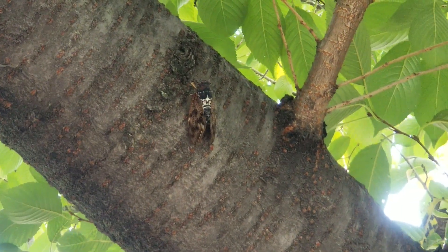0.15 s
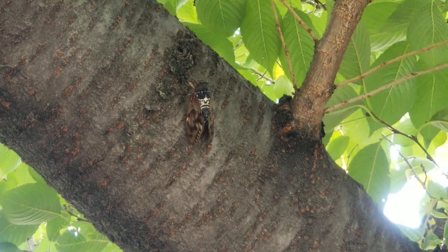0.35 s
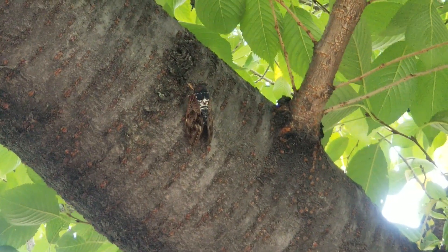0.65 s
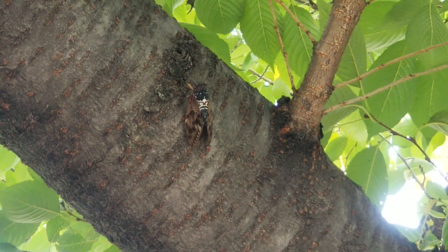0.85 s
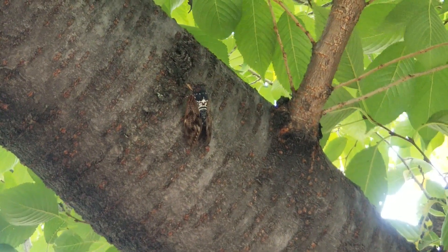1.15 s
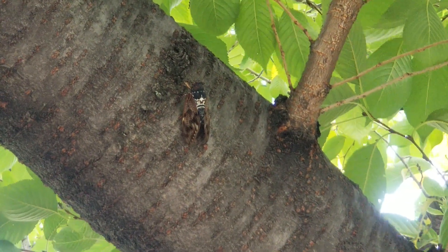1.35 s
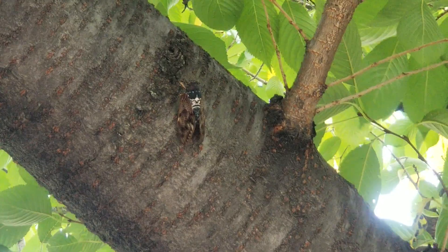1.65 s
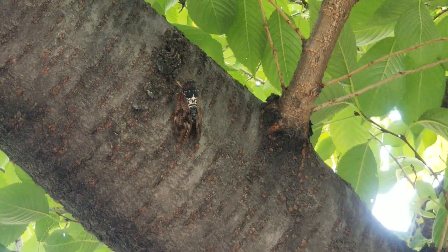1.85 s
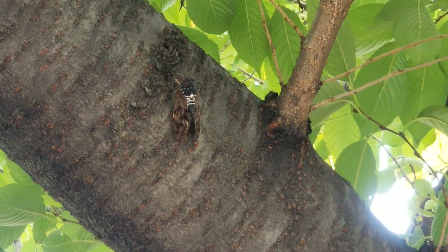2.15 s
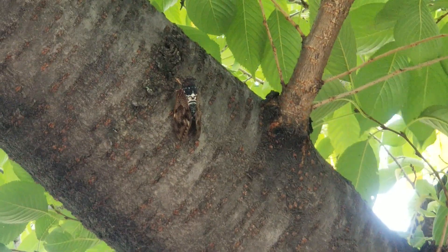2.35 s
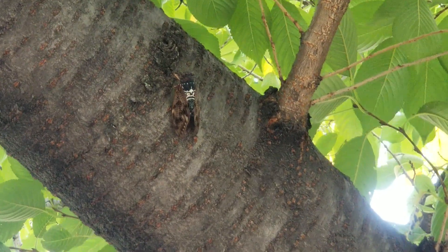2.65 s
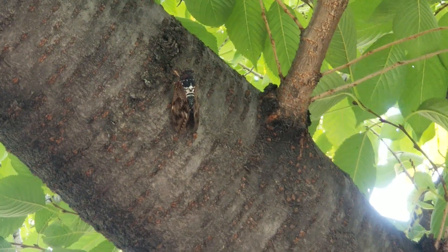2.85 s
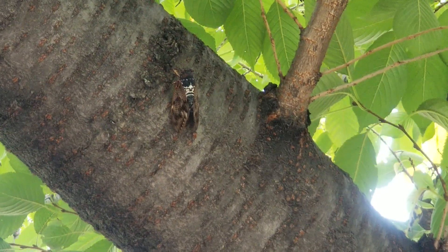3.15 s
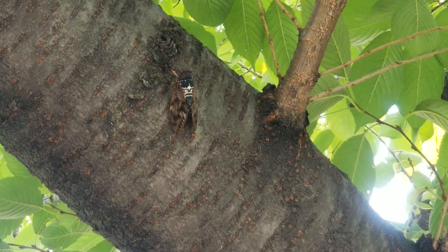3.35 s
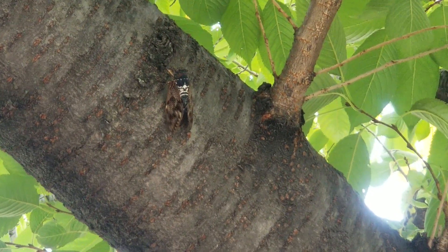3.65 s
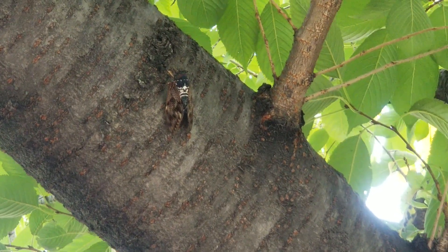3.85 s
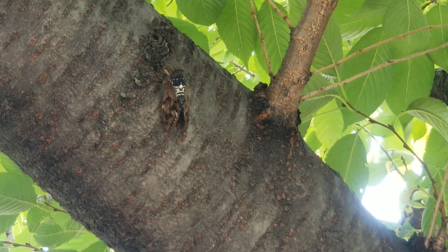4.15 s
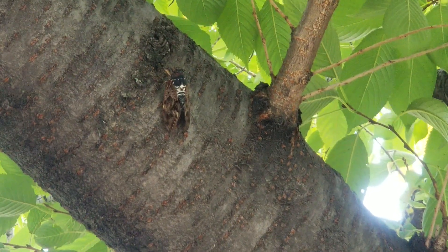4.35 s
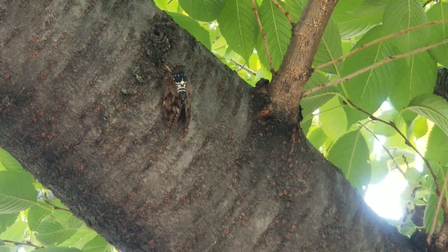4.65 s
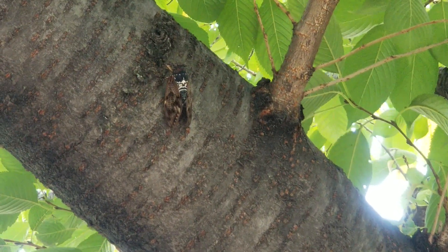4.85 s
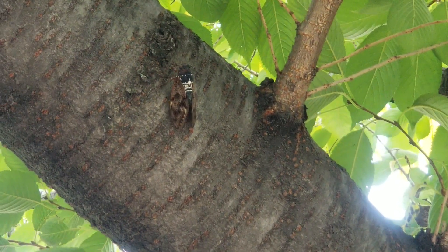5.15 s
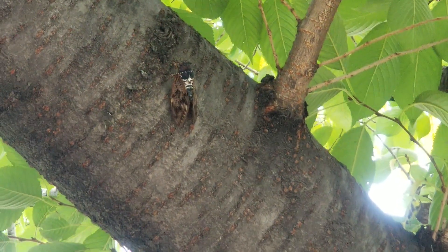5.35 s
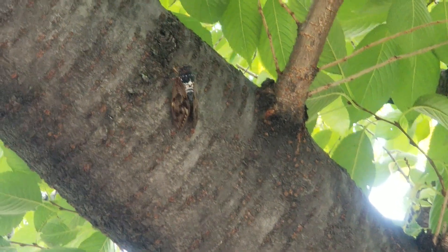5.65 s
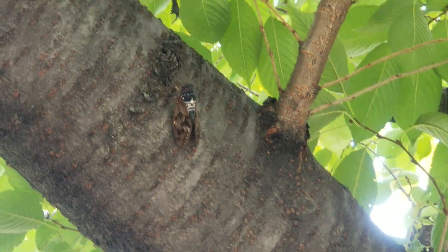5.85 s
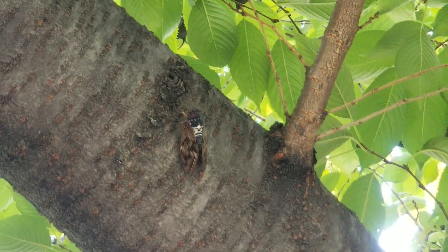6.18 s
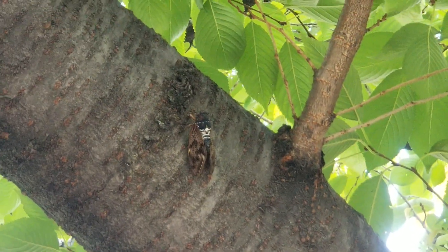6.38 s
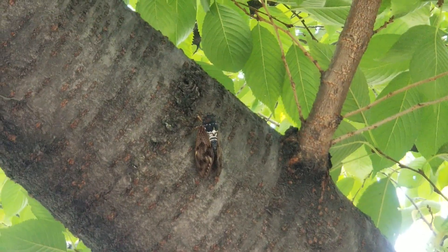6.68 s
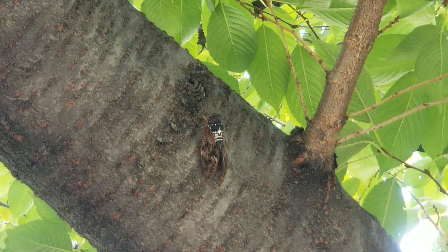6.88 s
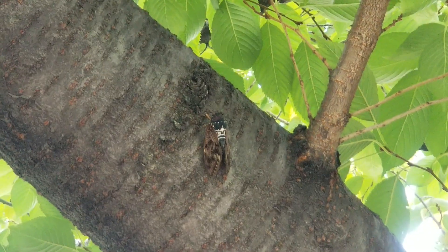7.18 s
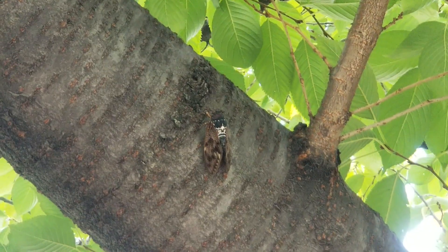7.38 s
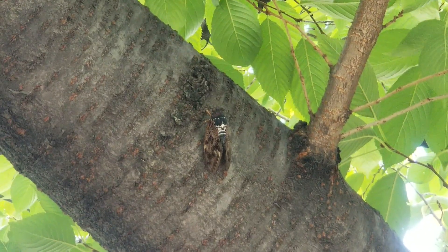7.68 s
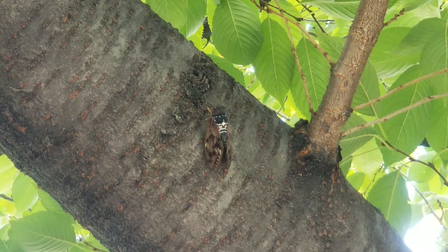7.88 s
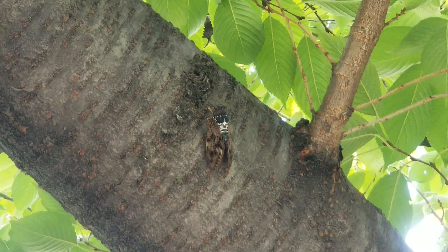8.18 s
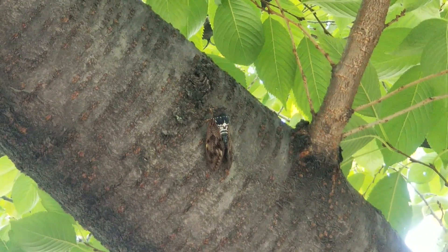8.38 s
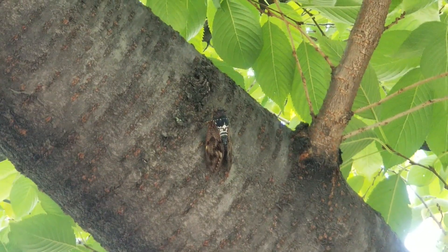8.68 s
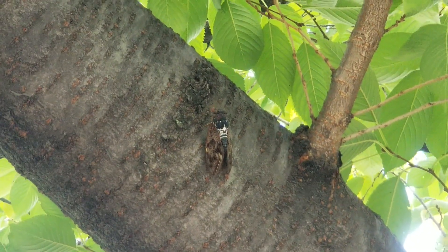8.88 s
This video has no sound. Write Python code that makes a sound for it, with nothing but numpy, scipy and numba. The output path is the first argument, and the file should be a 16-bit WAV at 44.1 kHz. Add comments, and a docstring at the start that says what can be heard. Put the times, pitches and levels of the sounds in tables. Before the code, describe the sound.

Continuous high insect buzzing from start to finish, crisp and grainy, with a rapid throb and evenly repeated rising, squeaky surges. Between surges come irregular dry clicks and short raspy pulses. Leaves and bark scatter the sound slightly, with more cicadas blended behind. The near camera microphone picks up dull finger bumps during the opening seconds, strongest around 2.4 to 2.7, over quiet low rumble; afterwards only the song and faint outdoor air remain.

```python
"""Cicada on a tree trunk

A cicada sizzles close above a hand-held camera: click trains from two tymbals excite resonances, and the abdomen throbs.
About every 0.7 s a resonance surges upward in pitch; loose ticks fill the gaps, over a low stuttering rasp.
Short decaying noise echoes scatter the insect's sound as bark and leaves do. Fingers bump the camera body,
a damped flexing with a dull rub, over coloured noise for the outdoor rumble and wash, and faint low drones."""
import sys
import numpy as np
from scipy import signal
from scipy.fft import rfft, irfft
from scipy.io import wavfile
from scipy.ndimage import uniform_filter1d
from numba import njit

SR = 44100
rng = np.random.default_rng(int(sys.argv[2]) if len(sys.argv) > 2 else 0)


def digitize_waveform(pressure):
    """Quantize a signal to 16-bit integers and store it at the path in sys.argv[1].

    Rows of a 2-D input are taken as channels; values are limited to [-1, 1].
    """
    field = np.atleast_2d(pressure).T
    bounded = np.clip(field, -1, 1)
    quanta = np.round(bounded * 32767).astype(np.int16)
    wavfile.write(sys.argv[1], SR, quanta)


N = 397782
TIME = np.arange(N) / SR


def undb(db):
    """Logarithmic level: decibels to amplitude gain."""
    return 10 ** (np.asarray(db) / 20)


def unit(x):
    """Normalisation: scale to rms 1."""
    return x / np.sqrt(np.mean(x ** 2))


def curves(table):
    """Linear interpolation: each column of a table, joined by lines over time."""
    s, *columns = np.transpose(table)
    return [np.interp(TIME, s, column) for column in columns]


def walk(rate_hz):
    """Band-limited fluctuation: smoothed random steps, rate_hz a second, with rms 1."""
    hold = max(int(SR / rate_hz), 1)
    steps = np.repeat(rng.standard_normal(N // hold + 1), hold)
    return unit(uniform_filter1d(steps, hold)[:N])


def hump(s, length):
    """Amplitude envelope: a rounded rise and fall from 0 to 1, centred on s, down to 1/e at length / 2."""
    return np.exp(-(2 * (TIME - s) / length) ** 4)


def pan(x, db):
    """Interaural level difference: the left channel stands db above the right."""
    return x * undb(np.array([[.5], [-.5]]) * db)


@njit
def svf(x, hz, width):
    """Simple resonator: a state-variable band-pass whose centre may move, with gain 1 there."""
    y, band, low = np.empty(len(x)), 0., 0.
    for i in range(len(x)):
        w = 2 * np.pi * hz[i] / SR
        g = np.tan(w / 2)
        damping = width / hz[i] * w / np.sin(w)
        v = (band + g * (x[i] - low)) / (1 + g * (g + damping))
        band = 2 * v - band
        low = low + 2 * g * v
        y[i] = damping * v
    return y


def ring(x, hz, width):
    """Cascaded resonance: two equal resonators in series steepen the skirts."""
    hz = np.clip(hz + np.zeros(len(x)), 20, .45 * SR)
    return svf(svf(x, hz, float(width)), hz, float(width))


def colour(x, points):
    """Spectral shaping: filter by (Hz, dB) points, falling away beyond the outermost; rms 1."""
    hz, db = np.transpose(sorted(points))
    log_hz = np.log(np.fft.rfftfreq(N, 1 / SR) + 1)
    outside = np.abs(log_hz - np.clip(log_hz, np.log(hz[0]), np.log(hz[-1])))
    gain = undb(np.interp(log_hz, np.log(hz), db) - 45 * outside)  # about 31 dB an octave outside
    return unit(irfft(rfft(x) * gain, N))


def noise(points, side_db):
    """Diffuse field: coloured noise as a mid part and a side part of opposite sign left and right."""
    mid, side = colour(rng.standard_normal((2, N)), points)
    return mid + undb(side_db) * side * np.array([[1], [-1]])


def tymbal(rate_hz, jitter, scatter_db, crackle, crackle_s):
    """Impulsive excitation by buckling: uneven clicks, each followed by the crackle of smaller ribs."""
    rate = rate_hz * (1 + jitter * walk(rate_hz) + .008 * walk(3))
    turns = np.cumsum(rate) / SR + rng.random()
    cycle = turns.astype(int)
    size = undb(scatter_db * rng.standard_normal(N)[cycle])  # one random size a click
    click = np.diff(cycle, prepend=cycle[0]) * 1.
    since_click_s = (turns % 1) / rate_hz
    tail = np.exp(-since_click_s / crackle_s) * rng.standard_normal(N)
    return unit(size * (unit(click) + crackle * unit(tail)))


def foliage(x, wet_db, t60, count=3):
    """Multiple scattering: direct sound plus short echoes off bark and leaves, shifting as leaves and hand sway."""
    t = np.arange(SR // 6) / SR
    wet = 0
    for k in range(count):
        echoes = rng.standard_normal((2, len(t))) * np.exp(-np.log(1000) * t / t60)
        echoes /= np.sqrt(np.sum(echoes ** 2, axis=1, keepdims=True))
        # the squared weights of the echo patterns always sum to 1
        sway = np.cos(2 * TIME + np.pi * k / count) * np.sqrt(2 / count)
        wet = wet + sway * signal.fftconvolve(x[None], echoes, axes=1)[:, :N]
    return (x + undb(wet_db) * wet) / np.sqrt(1 + undb(2 * wet_db))


# Resonant spectrum of the abdomen's air sac. Each row: frequency in Hz, relative level in dB.
AIR_SAC_SPECTRUM = [(3500, -32), (4050, -17), (4600, -11), (5000, 0), (5300, 1), (5800, -2), (6150, -5.5),
                    (6900, -16), (8000, -25), (9200, -23), (11100, -14.5), (13000, -10)]
# Resonant spectrum of the tymbal ribs. Each row: frequency in Hz, relative level in dB.
RIB_SPECTRUM = [(6000, -2), (7500, -3.5), (8300, -4.5), (9200, -20), (10000, -17), (11100, -5),
                (12100, -9.5), (13000, -2), (13950, 1.5), (14800, -6), (15700, -2)]


def sweep(clicks, turns, low_hz=5700, high_hz=7650, width_hz=1150, start=.4, top=.65, low_db=-8, octave_db=-4.5):
    """Moving resonance: once a throb, a band and its octave swell, glide up, sink back partly and fade."""
    share = (turns - start) % 1  # start and top are shares of a throb
    hz = low_hz + (high_hz - low_hz) * np.sin(np.pi / 2 * share / top)
    swell = np.sin(np.pi * share)
    low = colour(ring(clicks, hz, width_hz) * swell, AIR_SAC_SPECTRUM)
    octave = colour(ring(clicks, 2 * hz, 2 * width_hz) * swell ** 2, RIB_SPECTRUM)
    return undb(low_db) * low, undb(octave_db) * octave


# Pumping of the abdomen. Each row: time in seconds, throbs a second.
THROB_RATE = [(0, 14.285), (2, 14.85), (3, 14.73), (4.3, 14.92), (9, 14.96)]
# Strength of the steady sizzle. Each row: time in seconds, relative level of the air sac in dB,
# relative level of the rib treble in dB.
SIZZLE_LEVELS = [(0.0, -29, -31), (0.38, -30.5, -31.5), (2.86, -29, -31), (3.49, -32.5, -35),
                 (3.74, -31.5, -35.5), (4.22, -28.5, -30.5), (4.55, -29.5, -32.5), (4.97, -27.5, -32),
                 (5.27, -29.5, -32), (6.56, -28, -33.5), (7.18, -28, -33.5), (9.02, -23.5, -38)]
# Narrow ringing strands of the air sac. Each row: frequency in Hz, width of each resonator in Hz,
# relative level in dB, time when strongest in seconds, length in seconds.
AIR_SAC_STRANDS = [(5312, 55, -12.5, 4.2, 6.8), (5680, 80, -13, 2.9, 1.7), (5865, 50, -12.5, 5.8, .9)]


def sizzle(chorus_db=-5.5, chorus_treble_db=-8, chorus_side_db=-2, sac_db=-1.66, treble_db=-1, resting_db=-11,
           strand_waver_db=1.5, throb_treble_db=2.2, throb_body_db=-.7):
    """Source and resonator: two tymbals ring ribs and air sac; each throb trades top treble against body."""
    body_db, ribs_db = curves(SIZZLE_LEVELS)
    turns = np.cumsum(curves(THROB_RATE)[0]) / SR
    throb = np.cos(2 * np.pi * turns)
    clicks = tymbal(186, jitter=.04, scatter_db=1.5, crackle=6.3, crackle_s=0.028)
    clicks = clicks + tymbal(368, jitter=.06, scatter_db=-1.0, crackle=1.1, crackle_s=0.003)
    sweep_clicks = tymbal(368, jitter=0.048, scatter_db=.5, crackle=7.1, crackle_s=0.0063)
    glide, octave = sweep(sweep_clicks, turns)
    # the strands come and go as the air sac changes shape
    strands = 0
    for hz, width, db, s, length in AIR_SAC_STRANDS:
        presence_db = resting_db * (0.5 - hump(s, length))
        strand_db = db + presence_db + strand_waver_db * walk(2.97)
        strands = strands + unit(ring(clicks, hz, width)) * undb(strand_db)
    body = foliage(colour(clicks, AIR_SAC_SPECTRUM) + strands + glide, wet_db=-1, t60=0.13)
    ribs = foliage(colour(clicks, RIB_SPECTRUM) + octave, wet_db=-4.5, t60=0.055)
    # cicadas further off add a smooth wash of the same colour from all around
    body = body + undb(chorus_db) * noise(AIR_SAC_SPECTRUM, chorus_side_db)
    ribs = ribs + undb(chorus_treble_db) * noise(RIB_SPECTRUM, chorus_side_db)
    # the top of the treble opens and closes with the abdomen
    top = signal.sosfiltfilt(signal.butter(4, 12800, "high", fs=SR, output="sos"), ribs)
    ribs = ribs - top + top * undb(throb_treble_db * throb)
    body = body * undb(throb_body_db * throb)
    body = body * undb(body_db + sac_db + .5 * walk(20))
    return pan(body, 0.16) + pan(ribs * undb(ribs_db + treble_db), 4.4)


# Rumble of the grip and the surroundings. Each row: time in seconds, relative level in dB.
RUMBLE_LEVEL = [(0.0, -43), (0.4, -44.5), (2.31, -41.5), (2.59, -35), (2.76, -31), (2.91, -44),
                (3.37, -50.5), (3.62, -43.5), (3.87, -43), (5.98, -43), (6.16, -45.5), (9.02, -44.5)]
# Spectrum of the rumble. Each row: frequency in Hz, relative level in dB.
RUMBLE_SPECTRUM = [(15, -45), (25, -13), (51, -4), (75, 2.5), (135, 0.5), (167, -4.5), (196, 1),
                   (221, -7.5), (285, -11), (600, -33.5), (780, -31), (1320, -120)]
# Distant outdoor wash. Each row: time in seconds, relative level in dB.
WASH_LEVEL = [(0.2, -59), (1.61, -60), (2.81, -57), (3.6, -61), (4.27, -56), (8.58, -58), (8.8, -59)]
# Spectrum of the wash. Each row: frequency in Hz, relative level in dB.
WASH_SPECTRUM = [(250, 10.5), (450, 0.5), (750, 0), (1300, -5.5), (2200, -4), (3200, -4), (8000, -10),
                 (16000, -15.5)]
# Faint drones that come and go. Each row: middle in seconds, level in dB, pitch in Hz, length in seconds.
LOW_DRONES = [(0.745, -47, 203, 0.91), (4.57, -44, 138.4, 0.84)]
# The hand comes to rest: start and end of the settling, in seconds.
GRIP_SETTLING = (3.2, 3.3)


def outdoors(rumble_db=0.46, wash_db=10, wash_side_db=-8.2, shifting_db=2.2, resting_db=0.05,
             grip_db=-45, grip_hz=62, grip_width_hz=90):
    """Broadband ambience: low rumble, partly carried through the grip, faint drones and a distant wash."""
    # while the grip shifts, the rumble is deeper and more uneven and leans further left
    shifting = np.interp(TIME, GRIP_SETTLING, [1, 0])
    uneven_db = resting_db + shifting * (shifting_db - resting_db)
    rumble_level_db = curves(RUMBLE_LEVEL)[0] + rumble_db + uneven_db * walk(12)
    rumble = noise(RUMBLE_SPECTRUM, side_db=-30) * undb(rumble_level_db)
    grip = unit(ring(rng.standard_normal(N), grip_hz, grip_width_hz))
    grip = shifting * grip * undb(grip_db + shifting_db * walk(7.43))
    wash_level_db = curves(WASH_LEVEL)[0] + wash_db + 1.22 * walk(5)
    wash = noise(WASH_SPECTRUM, wash_side_db) * undb(wash_level_db)
    drones = 0
    for s, db, hz, length in LOW_DRONES:
        drone = unit(ring(rng.standard_normal(N), hz, 5.8))
        drones = drones + undb(db) * hump(s, length) * drone
    return pan(rumble + grip, 0.96 + 3.2 * shifting) + pan(wash + drones, 0.51)


# Rising surges of the song. Each row: time of the top in seconds, level in dB,
# relative level of the overtone in dB.
RISING_SURGES = [(.113, -21.5, -7.5), (.8, -22.5, -6.5), (1.446, -23, -6.5), (2.101, -23.5, -6.5),
                 (2.803, -23.5, -7.5), (3.479, -25, -11.5), (4.184, -22.5, -9), (4.884, -22, -8.5),
                 (5.548, -24, -7), (6.204, -22, -10), (6.849, -21.5, -12), (7.555, -22, -10.5),
                 (8.238, -21.5, -10), (8.91, -22, -10.5)]


def surges(low_hz=4550, high_hz=6250, over_low_hz=9900, over_high_hz=12200, lead_s=0.084, climb_s=0.024,
           fall_s=0.011, edge_hz=4150):
    """Tension raises resonance: the tymbal tightens, a note swells, climbs late with its overtone, and stops."""
    swell, overtone, tension = np.zeros((3, N))
    for s, db, over_db in RISING_SURGES:
        near = np.abs(TIME - s) < .3
        t = TIME[near] - s
        tension[near] = np.exp(-(np.minimum(t, 0) / climb_s) ** 2)
        rise = 1 / (1 + np.exp(-(t + lead_s) / 0.023))  # half-way up lead_s before the top
        stop = 1 / (1 + np.exp((t - .017) / fall_s))
        swell[near] += undb(db) * rise * stop
        overtone[near] = undb(over_db) * (0.56 + 1.68 * tension[near])
    clicks = tymbal(345, jitter=0.083, scatter_db=1.5, crackle=1.36, crackle_s=0.0023)
    low = ring(clicks, low_hz + 200 * tension, 1230)
    low = unit(signal.sosfilt(signal.butter(5, edge_hz, "high", fs=SR, output="sos"), low))
    high = unit(ring(clicks, high_hz - 1000 * (1 - tension), 890))
    over = unit(ring(clicks, over_low_hz + (over_high_hz - over_low_hz) * tension, 3100))
    song = swell * (0.77 * low + high * (0.32 + 0.33 * tension) + overtone * over)
    # the surges lean left at first and come nearer the middle as the camera drifts
    return pan(foliage(song, wet_db=-2.5, t60=0.087), np.interp(TIME, [0, 9], [5.5, 1.5]))


# Spectrum of the low rasp. Each row: frequency in Hz, relative level in dB.
RASP_SPECTRUM = [(1900, -27), (2500, -17.5), (3300, -13.5), (3900, -14.5), (4500, 0), (5150, 5),
                 (6000, -23), (8000, -16), (9300, -13), (10700, -3.5), (12500, -14), (15500, -35)]
# Long rasps. Each row: middle in seconds, relative level in dB.
LONG_RASPS = [(2.93, -22.5), (5.172, -24), (5.5, -22), (8.44, -22)]
# Runs of short rasping pulses. Each row: first pulse in seconds, last pulse in seconds,
# pulses a second, relative level in dB.
STUTTER_RUNS = [(.089, 1.44, 16.2, -28.5), (1.557, 2.36, 16.22, -29), (2.415, 2.74, 18.4, -27.5),
                (3.07, 4.12, 15.2, -30.5), (4.408, 4.66, 16, -28.5), (5.0, 5.37, 13.5, -28.5),
                (5.642, 6.05, 17.2, -30), (6.398, 6.97, 17.5, -28.5), (7.138, 7.78, 15.7, -28.5),
                (7.992, 8.06, 15.4, -28), (8.52, 8.95, 16.4, -29.5)]


def rasps(rasp_db=-4, rasp_s=0.095, stutter_db=-2.5, pulse_s=.016):
    """Amplitude modulation: slack, coarse clicks gated into even stuttering runs and a few long rasps."""
    effort = sum(undb(db + rasp_db) * hump(s, rasp_s) for s, db in LONG_RASPS)
    for first, last, rate, db in STUTTER_RUNS:
        # number of the pulse nearest to each moment
        nearest = np.clip(np.round((TIME - first) * rate), 0, np.round((last - first) * rate))
        effort = effort + undb(db + stutter_db) * hump(first + nearest / rate, pulse_s)
    clicks = tymbal(320, jitter=.12, scatter_db=1.5, crackle=1.1, crackle_s=.002)
    return pan(foliage(colour(clicks, RASP_SPECTRUM) * effort, wet_db=-18, t60=.04), 0.92)


# Spectrum of a slack tymbal's click. Each row: frequency in Hz, relative level in dB.
SLACK_SPECTRUM = [(2500, -31), (3400, -25), (3950, -15), (4400, 0), (4900, -3.5), (5600, -9), (7000, -28),
                  (8800, -23), (11000, -14), (15500, -24)]
# The loudest loose clicks. Each row: time in seconds, relative level in dB.
LOUD_TICKS = [(.218, -41), (.911, -37.5), (.959, -37), (1.614, -38), (1.736, -35), (4.409, -37),
              (5.374, -40), (5.817, -39), (6.56, -39), (6.621, -40), (7.093, -40), (7.937, -38),
              (8.334, -34), (8.703, -39)]


def ticks(tick_db=-38.0, patter_hz=50, patter_db=-44, patter_scatter_db=1.5, uneven=.65, rest_s=.085):
    """Irregular impulses through a resonator: a slack tymbal ticks between surges; some clicks stand out."""
    turns = np.cumsum(patter_hz * np.exp(uneven * walk(patter_hz))) / SR
    # the patter rests for rest_s on either side of a surge's top
    ticking = np.all([np.abs(TIME - s) > rest_s for s, *_ in RISING_SURGES], axis=0)
    size = undb(patter_db + patter_scatter_db * walk(patter_hz))
    clicks = np.diff(np.floor(turns), prepend=0) * ticking * size
    for s, db in LOUD_TICKS:
        clicks[int(s * SR)] += undb(db)
    # colouring sets the whole train to rms 1, so the click levels are relative
    return pan(foliage(colour(clicks, SLACK_SPECTRUM) * undb(tick_db), wet_db=-5, t60=0.07), 0.27)


# Finger bumps on the camera. Each row: time in seconds (3 ms after the onset), relative level in dB,
# pitch of the flexing in Hz.
FINGER_BUMPS = [(0.263, -27.5, 100), (0.375, -23, 117), (0.409, -22.5, 117), (0.689, -28, 191),
                (.765, -23.5, 90), (.794, -32, 163), (1.051, -20, 109), (1.08, -25.5, 160),
                (1.14, -22.5, 101), (1.443, -26.5, 127), (1.742, -23, 122), (1.816, -27.5, 157),
                (1.866, -29, 92), (2.381, -17.5, 101), (2.411, -21, 110), (2.507, -24, 116),
                (2.572, -24, 154), (2.701, -23.5, 177), (2.742, -16.5, 137), (2.902, -23.5, 97),
                (3.145, -32, 158), (3.72, -27.5, 121), (3.775, -26, 97)]


def handling(bump_db=1, push_s=0.0065, shell_db=-7, dull_hz=430):
    """Damped oscillation: each bump flexes the camera body for about a cycle and leaves a short dull rub."""
    out = np.zeros(N + SR)
    t = np.arange(SR // 5) / SR
    for s, db, hz in FINGER_BUMPS:
        flex = np.sin(2 * np.pi * hz * t) * np.exp(-t / push_s) * (1 - np.exp(-t / 0.0022))
        rub = unit(ring(rng.standard_normal(len(t)), 1.13 * hz, 1.15 * hz))
        rub = rub * np.exp(-t / 0.026) * (1 - np.exp(-t / 0.00087))
        start = max(int((s - .003) * SR), 0)
        out[start:start + len(t)] += undb(db + bump_db) * (2.83 * flex + undb(shell_db) * rub)
    return pan(signal.sosfilt(signal.butter(4, dull_hz, fs=SR, output="sos"), out[:N]), 9.3)


def scene():
    """Superposition: everything heard under the tree is summed."""
    return sizzle() + outdoors() + surges() + rasps() + ticks() + handling()


def record(dry, top_hz=15800):
    """Band limiting: the camera cuts the top steeply, by an elliptic low-pass."""
    return signal.sosfilt(signal.ellip(12, .2, 80, top_hz, fs=SR, output="sos"), dry)


dry = scene()
out = record(dry)
digitize_waveform(out)
```